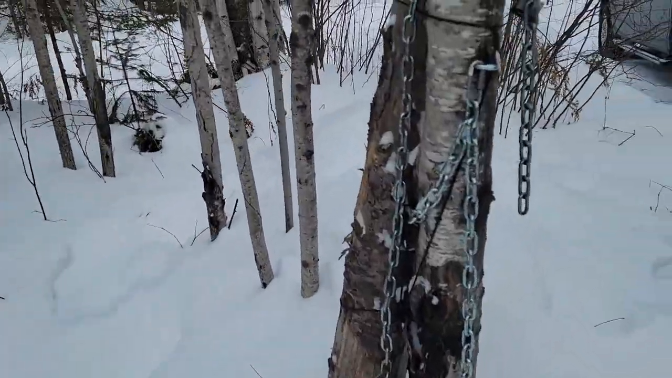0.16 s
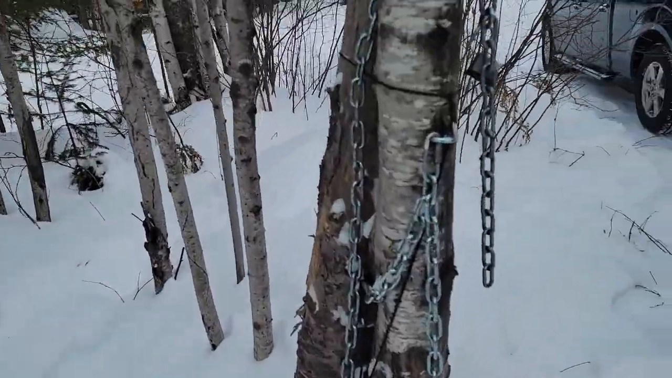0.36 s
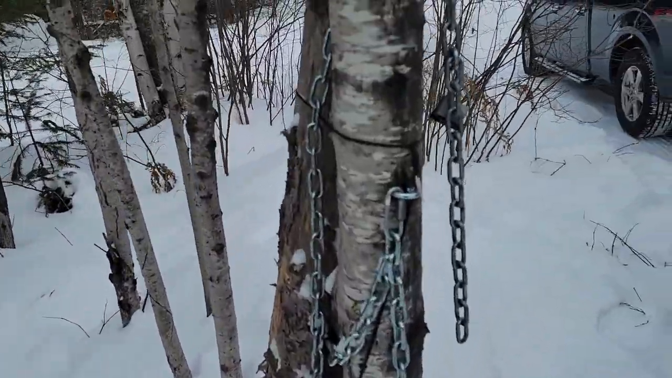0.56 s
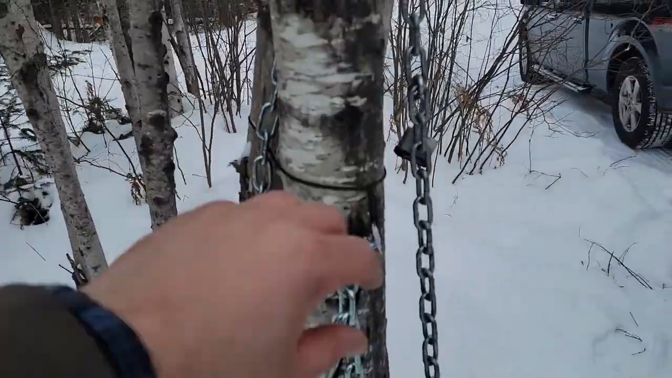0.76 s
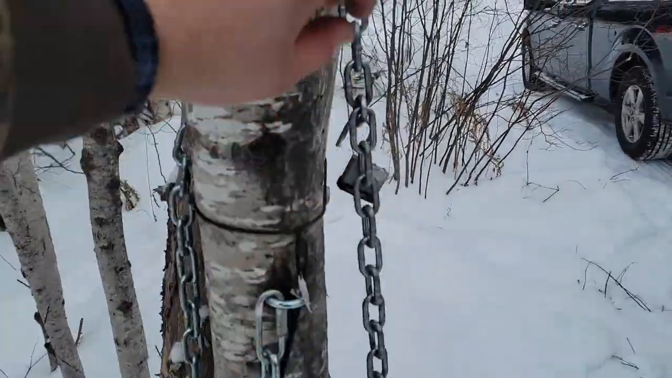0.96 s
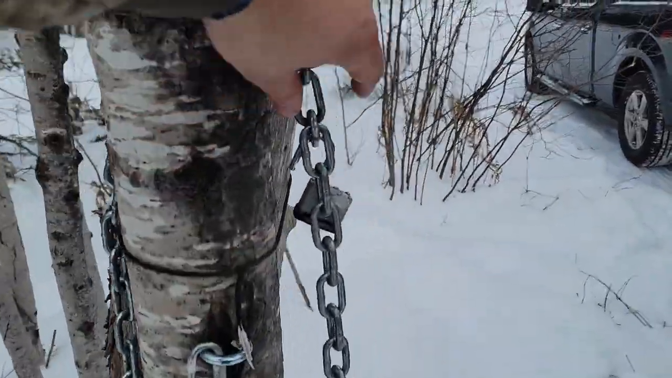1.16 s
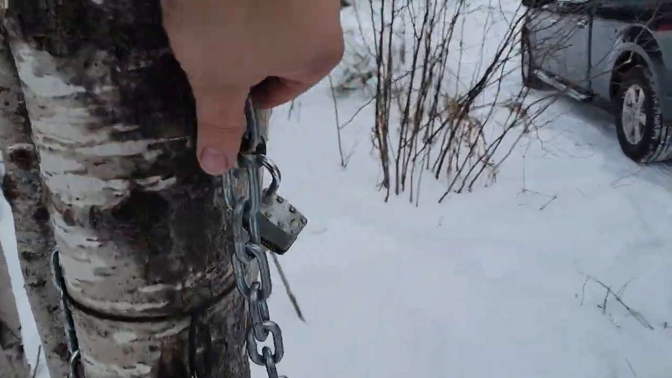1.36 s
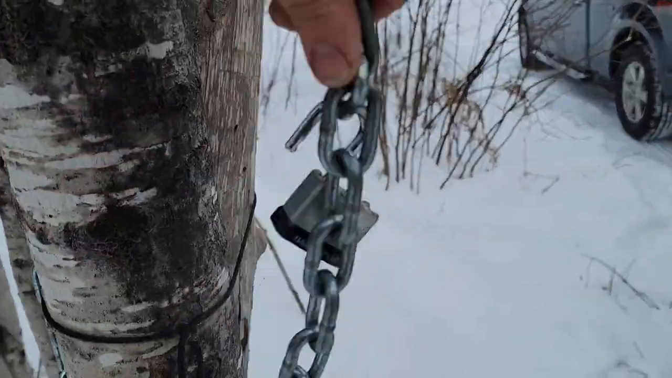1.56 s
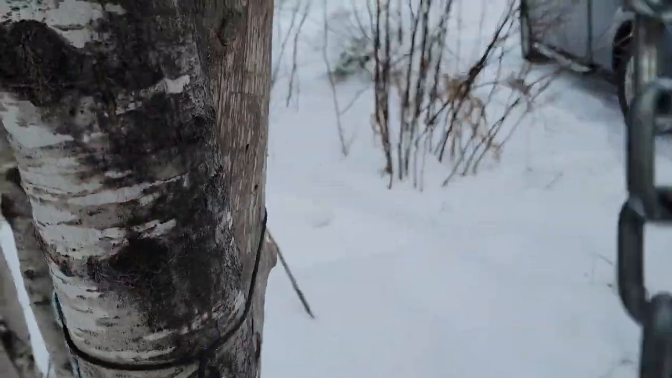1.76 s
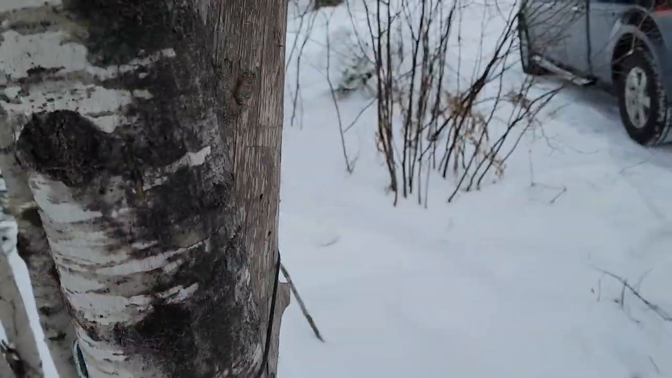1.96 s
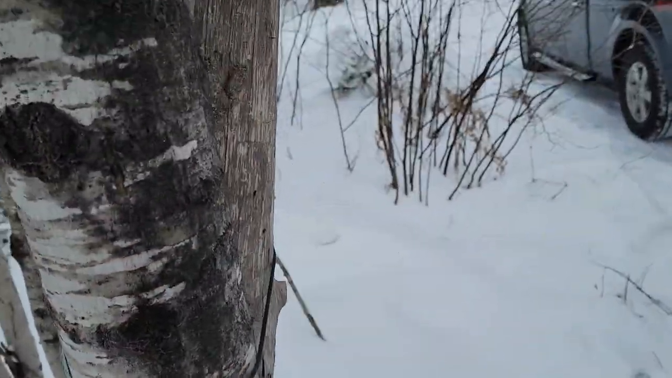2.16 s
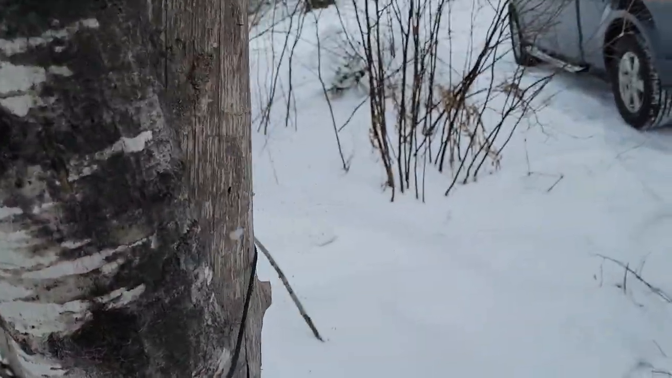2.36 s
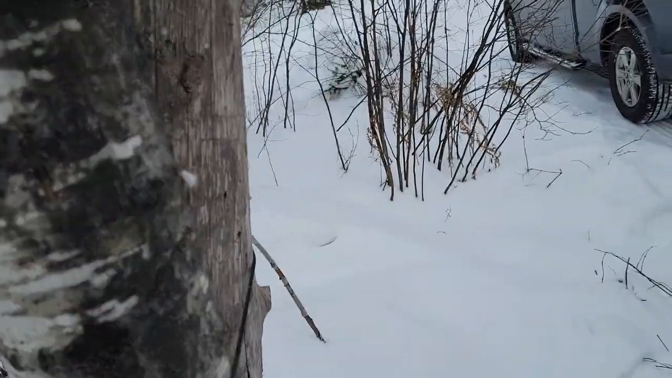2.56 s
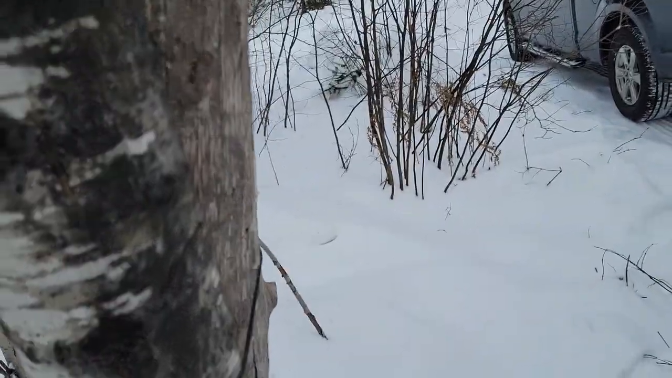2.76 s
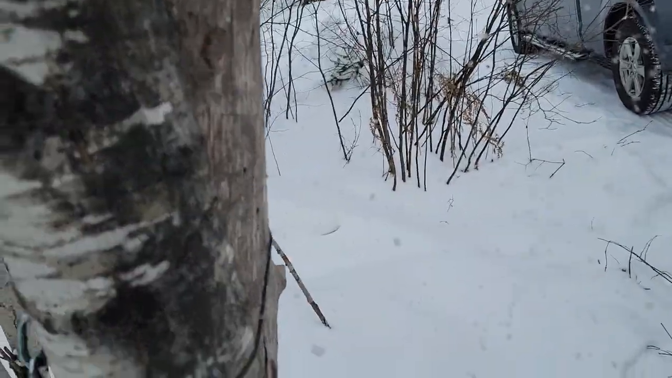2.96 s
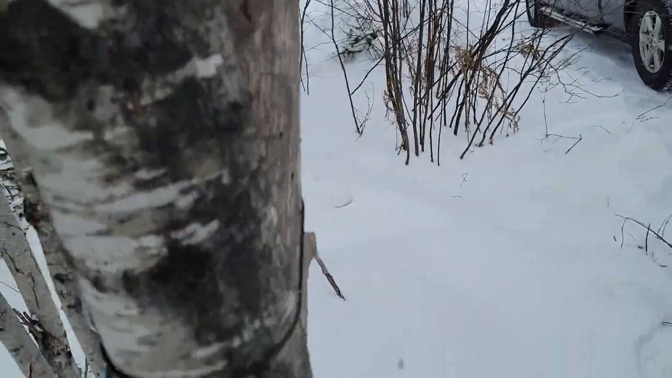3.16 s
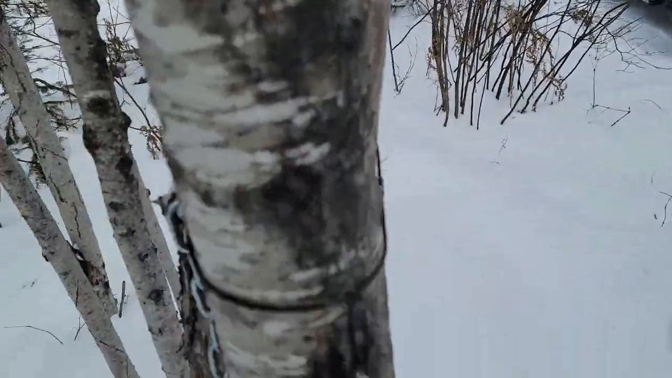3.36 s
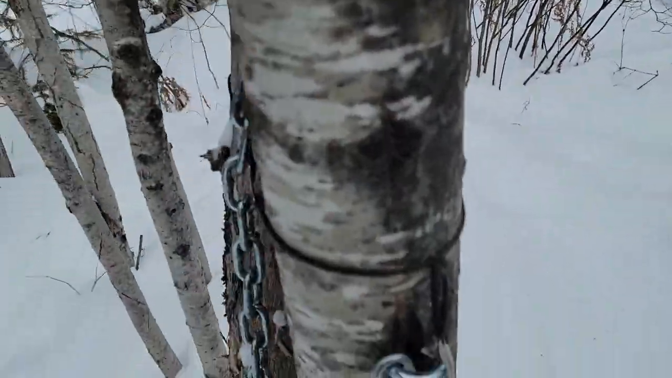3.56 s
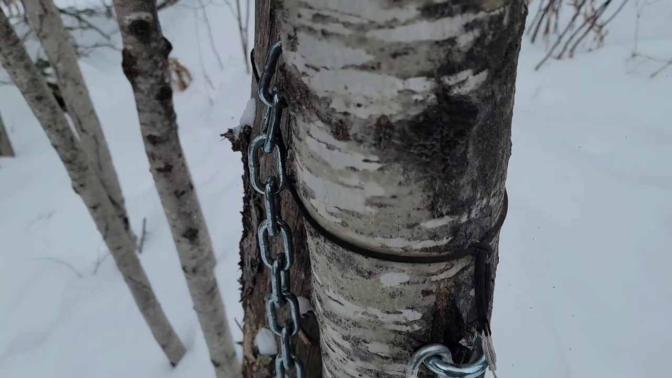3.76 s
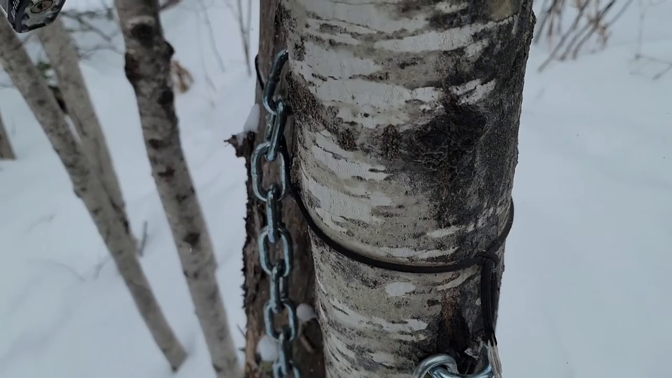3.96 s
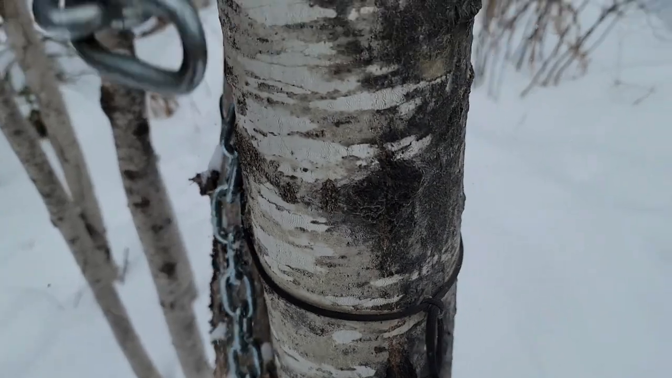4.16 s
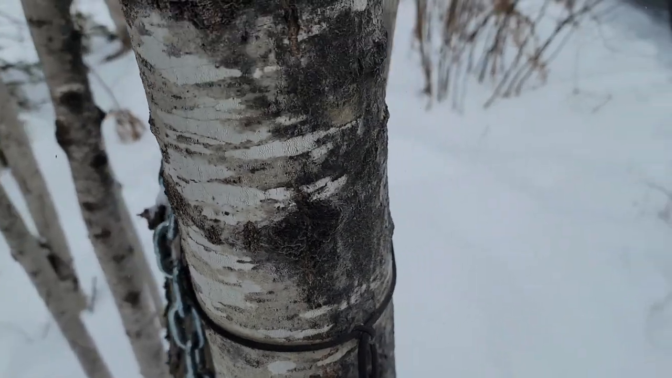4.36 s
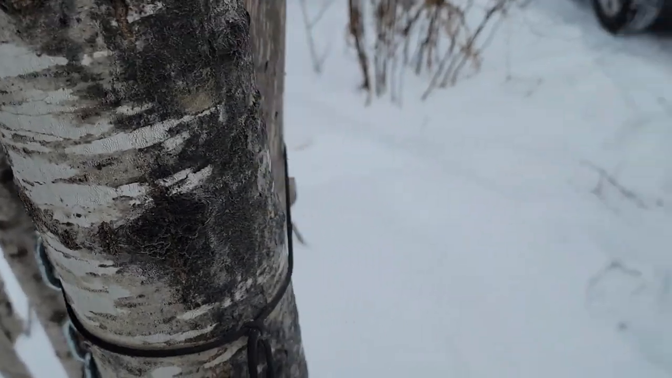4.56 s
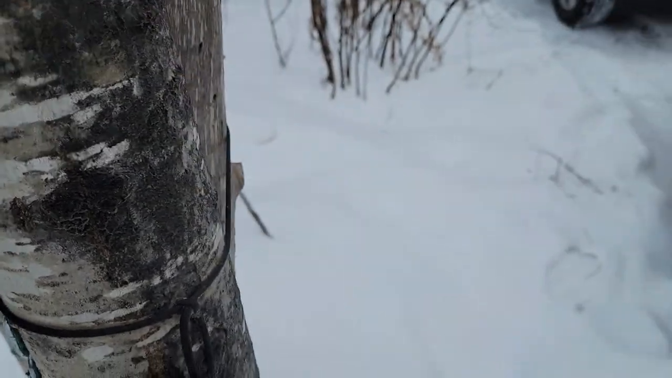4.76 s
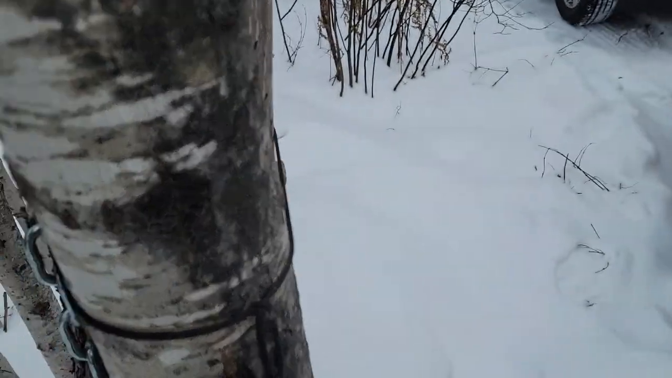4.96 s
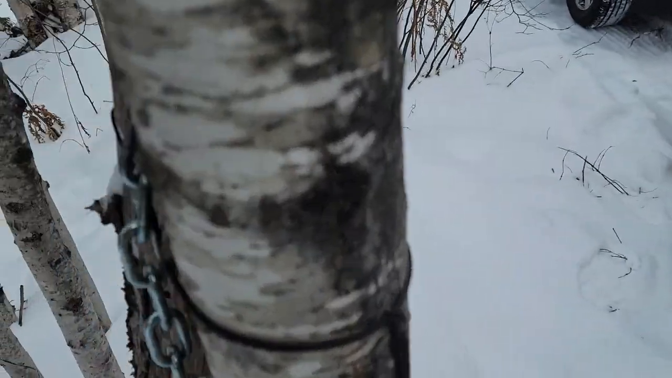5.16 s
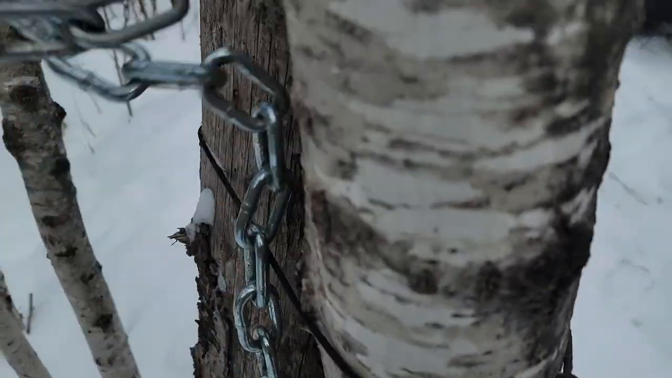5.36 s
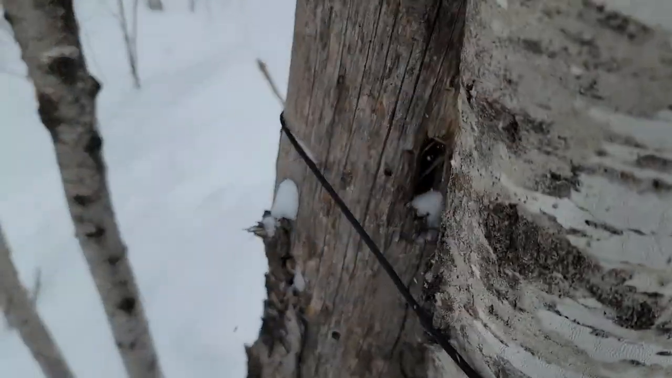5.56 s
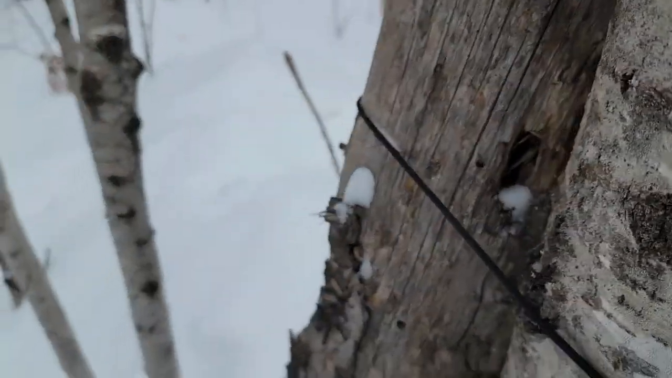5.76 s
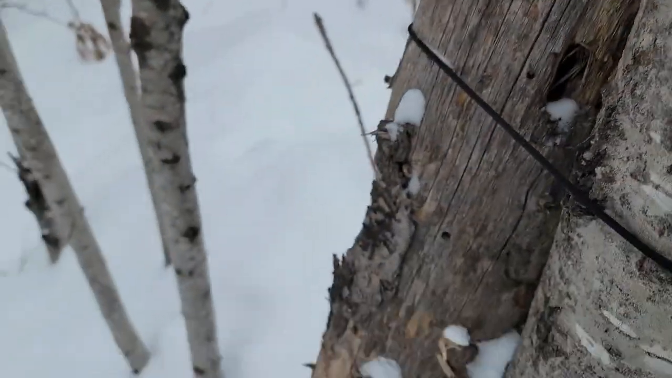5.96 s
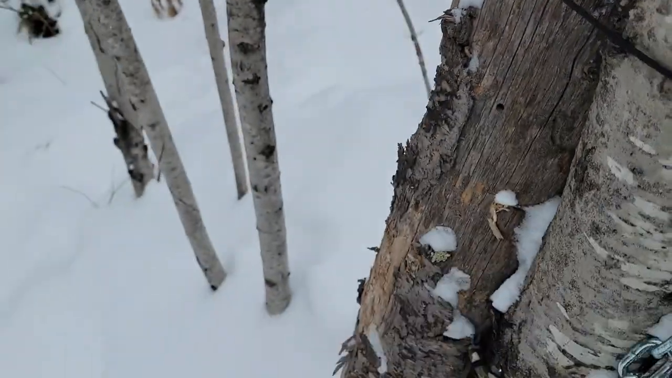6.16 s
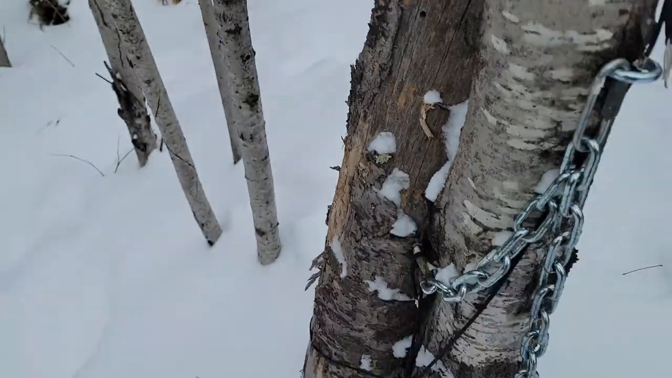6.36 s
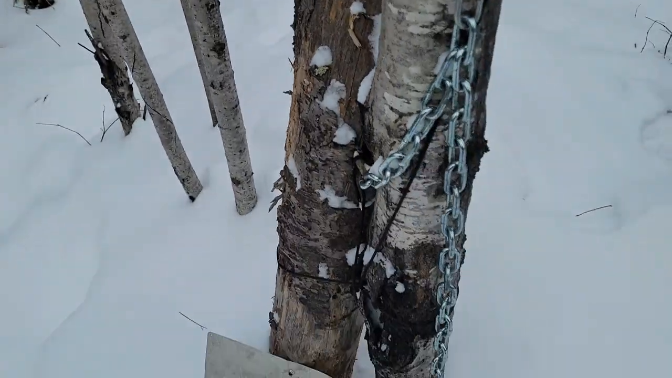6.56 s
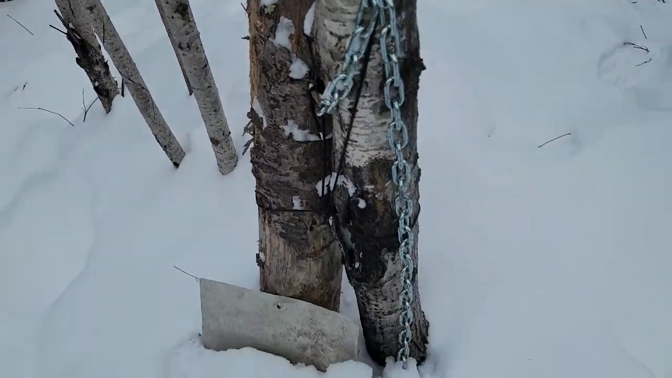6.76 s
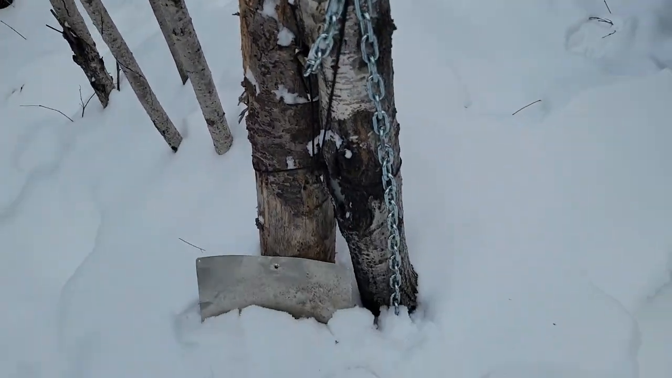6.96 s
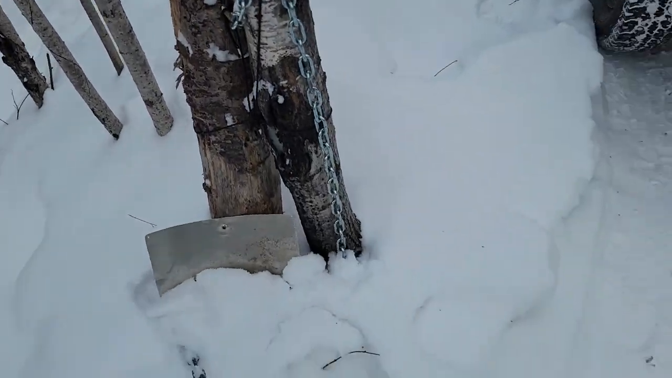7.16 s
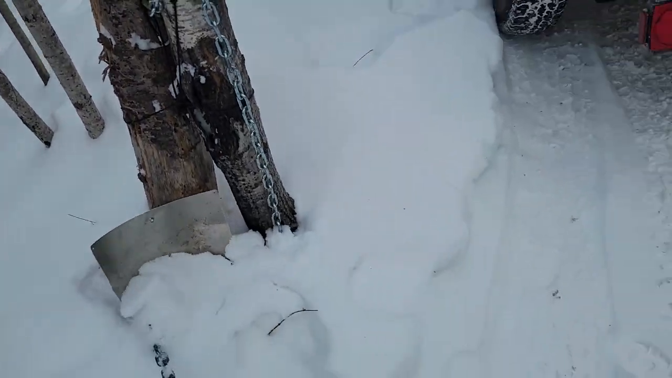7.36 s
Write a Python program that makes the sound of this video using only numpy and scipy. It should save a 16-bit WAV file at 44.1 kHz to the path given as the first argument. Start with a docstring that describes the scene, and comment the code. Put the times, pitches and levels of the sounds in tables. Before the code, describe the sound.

A steel chain is dragged round a tree trunk, scraping bark, knocking wood and chattering brightly, with soft snow crunches before and after.

```python
"""Outdoors in snow, close to a phone: a boot crunches softly and hand and sleeve pat as a steel chain is lifted.
Then it is drawn round a tree post: grains of slip scrape the bark, snags knock, the post groans and booms.
Over this, bursts of random contacts and hard taps set the links chattering and ringing very high.
Last the chain is hung up and boots crunch again. Filtered noise gives a faint hush throughout;
there is no room, only a close echo of the scraping off the trunk."""
import sys
import numpy as np
from scipy import signal
from scipy.fft import rfft, irfft
from scipy.io import wavfile
from scipy.ndimage import uniform_filter1d

SR = 44100
rng = np.random.default_rng(int(sys.argv[2]) if len(sys.argv) > 2 else 0)


def write(x):
    x = np.atleast_2d(x).T
    wavfile.write(sys.argv[1], SR, np.round(np.clip(x, -1, 1) * 32767).astype(np.int16))


N = 327486
TIME = np.arange(N) / SR
SNAP_S = 0.0013  # decay time constant of the first touch of a blow

# colour of steel contacts: f/Hz, relative gain/dB
STEEL_COLOUR = [(1000, -11.5), (6500, 1), (9500, -10), (13600, 0.5)]
# colour of rasping, splintering and crunching: f/Hz, relative gain/dB
RASP_COLOUR = [(300, -20), (800, -2), (1300, 3.5), (2300, 3), (3300, -1), (3900, -7.5), (4900, -15.5),
               (7000, -14), (8500, -25)]
# colour of thuds and packing snow: f/Hz, relative gain/dB
THUD_COLOUR = [(50, -14), (140, -16), (330, -4), (950, -12), (4000, -45.5)]
# side of the dragging and knocks: t/s, left minus right/dB
DRAG_PAN = [(3.1, 1), (3.6, -3)]


def undb(db):
    """Decibels to gain."""
    return 10 ** (np.asarray(db) / 20)


def unit(x):
    """Scale to rms 1."""
    return x / np.sqrt(np.mean(x ** 2) + 1e-18)


def curves(table):
    """Each column of a table, joined by straight lines in time."""
    s, *columns = np.transpose(table)
    return [np.interp(TIME, s, column) for column in columns]


def sides(pan_db):
    """Left and right gains of constant total power; positive is left."""
    return np.sqrt(2 / (1 + undb(np.array([[-2], [2]]) * pan_db)))


def add(out, s, sound):
    """Mix a sound into a stereo signal at time s."""
    i = max(int(s * SR), 0)
    out[:, i:i + sound.shape[1]] += sound[:, :N - i]


def colour(x, points):
    """Minimum-phase filter through (Hz, dB) points, built from the folded cepstrum."""
    hz, db = np.transpose(points)
    size = 2048
    grid_hz = np.maximum(np.fft.rfftfreq(size, 1 / SR), 1)
    gain_db = np.interp(np.log(grid_hz), np.log(hz), db)
    cepstrum = irfft(np.log(undb(gain_db)))
    cepstrum[1:size // 2] *= 2
    cepstrum[size // 2 + 1:] = 0
    impulse = irfft(np.exp(rfft(cepstrum)))
    return signal.fftconvolve(x, impulse[None], axes=1)[:, :x.shape[1]]


def ring(x, hz, t60):
    """One mode, decaying 60 dB in t60 seconds."""
    r = np.exp(-np.log(1000) / (t60 * SR))
    w = 2 * np.pi * hz / SR
    return signal.lfilter([1, -r * np.cos(w)], [1, -2 * r * np.cos(w), r * r], x)


def resonance(x, hz, width_hz):
    """A narrow band of x, with gain near 1 at its centre."""
    t60 = np.log(1000) / (np.pi * width_hz)
    return 2 * np.pi * width_hz / SR * ring(x, hz, t60)


def walk(rate_hz):
    """Smooth random wandering of rms 1."""
    k = max(int(SR / rate_hz), 1)
    held = np.repeat(rng.standard_normal(N // k + 1), k)
    return unit(uniform_filter1d(held, k)[:N])


def grains(rate_hz, spread_db, apart, lag_s=.00027):
    """Tiny uneven slips at two microphone ports: a shared part, late on the right, and a separate part (apart)."""
    clicks = (rng.random((3, N)) < rate_hz / SR) * rng.choice([-1, 1], (3, N))
    sizes = undb(spread_db * np.minimum(rng.exponential(size=(3, N)), 4))
    both, left, right = clicks * sizes
    late = np.roll(both, int(lag_s * SR))
    return unit(np.array([both + apart * left, late + apart * right]))


def swell(s, rise_s, fall_s, hold_s=0, span_db=20):
    """Gain of one movement: grows to 1 at time s, holds and dies away; rise and fall each span span_db."""
    early = np.maximum(s - TIME, 0)
    late = np.maximum(TIME - s - hold_s, 0)
    return undb(-span_db * np.minimum(early / rise_s + late / fall_s, 10))


def outdoors(level_db=-52):
    """Partly shared noise, coloured to a distant low rumble under a thin hush, wanders slowly in level."""
    # f/Hz, relative gain/dB
    hush_colour = [(25, -23), (62, 5.5), (110, -4), (400, -15), (3000, -26.5), (12000, -57)]
    air = rng.standard_normal(N) / 2 + rng.standard_normal((2, N))
    return unit(colour(air, hush_colour)) * undb(level_db + 2 * walk(rate_hz=0.48))


def buffeting(s=2.13, rise_s=.2, fall_s=.34, hold_s=1.65, level_db=-42, hz=65):
    """While the phone moves round the post, air rumbles on each microphone port separately."""
    air = resonance(rng.standard_normal((2, N)), hz, hz)
    return unit(resonance(air, hz, 2 * hz)) * undb(level_db) * swell(s, rise_s, fall_s, hold_s)


def footsteps(give_db=2, attack_s=.027, release_s=.041):
    """Under each load the snow gives way in small collapses, with crystals crackling on top."""
    # boots pressing into snow: t/s, hold/s, packing level/dB, crunch level/dB
    steps = [(0.097, 0.23, -42.5, -47), (6.569, 1, -60, -52.5), (6.981, 0.0059, -31, -34.5),
             (7.097, 0.0054, -33, -45), (7.241, 0.12, -44.5, -55.5)]
    pack, crunch = sum(np.outer(undb([pack_db, crunch_db]), swell(s, attack_s, release_s, hold_s))
                       for s, hold_s, pack_db, crunch_db in steps)
    give = give_db * walk(rate_hz=46)
    low = unit(colour(grains(rate_hz=260, spread_db=3, apart=0.3), THUD_COLOUR))
    high = unit(colour(grains(rate_hz=400, spread_db=2.5, apart=1.0), RASP_COLOUR))
    return low * pack * undb(give) + high * crunch * undb(give / 2)


def sleeve(flutter_db=1.5):
    """Dense fine slips make the smooth hiss of sliding cloth, swelling with each move of the arm."""
    # fastest move t/s, rise/s, fall/s, level/dB
    swishes = [(0.87, 0.49, 0.7, -51), (1.802, 0.28, 0.24, -43.5)]
    cloth = grains(rate_hz=7800, spread_db=8.0, apart=1.0)
    hiss = unit(colour(cloth, [(1000, -34.5), (6500, 9.0), (9000, 0.5)]))
    moves = sum(undb(db) * swell(s, rise_s, fall_s) for s, rise_s, fall_s, db in swishes)
    return hiss * moves * undb(flutter_db * walk(rate_hz=20))


def pats(hz=430, width_hz=330, t60=0.059):
    """A pat is a brief, dull, band-limited burst of cloth or skin on wood."""
    # soft pats of hand and sleeve: t/s, level/dB
    pat_times = [(0.048, -37.5), (0.159, -35), (1.001, -32), (1.064, -30.5), (1.151, -35), (1.187, -31.5),
                 (5.254, -40), (5.285, -39), (6.419, -39.5)]
    force = np.zeros((2, N))
    for s, db in pat_times:
        add(force, s, undb(db - 60 * TIME[None, :SR // 2] / t60))
    rubbing = grains(rate_hz=3500, spread_db=1.5, apart=0.46)
    dull = resonance(resonance(rubbing, hz, width_hz), hz, 2 * width_hz)
    return force * unit(dull)


def thumps(hz=235, t60=0.092):
    """Each soft bump booms the post at one low pitch, within 15 % of hz."""
    # t/s, peak level/dB
    bumps = [(0.252, -26), (2.456, -25), (4.734, -26), (5.367, -21)]
    out, t = np.zeros((2, N)), TIME[None, :SR // 2]
    for s, db in bumps:
        pitch_hz = hz * rng.uniform(.85, 1.15)
        add(out, s, undb(db - 60 * t / t60) * np.sin(2 * np.pi * pitch_hz * t))
    return out


def trunk(x, delay_s=.0013, sway=.14, echo=.35):
    """The trunk mirrors the scraping; the wandering delay of this close echo slides its spectral peaks."""
    late = (TIME - delay_s * (1 + sway * walk(rate_hz=6))) * SR
    mirrored = np.array([np.interp(late, np.arange(N), port) for port in x])
    return (x + echo * mirrored) / np.hypot(1, echo)


def knocks(hook_width_hz=32):
    """Each snag is a dull thud and a spray of splintery clicks that rings the steel hook and dies away."""
    # snags of the chain on the post: t/s, thud level/dB, crack level/dB, t60/s
    snags = [(1.915, -44, -13.5, 0.12), (2.093, -28.5, -31, 0.23), (2.178, -21.5, -25, 0.22),
             (3.149, -38.5, -13.5, 0.41), (3.238, -27.5, -16.5, 0.061), (3.645, -23.5, -16.5, 0.36),
             (3.762, -28, -13, 0.75), (3.772, -9.5, -13.5, 0.03), (4.301, -17.5, -31, 0.066),
             (4.722, -36, -37, 0.15), (5.401, -23.5, -27.5, 0.14)]
    # ringing of the hook: f/Hz, mean gain/dB
    hook_modes = [(1378, -0.5), (2025, 7), (2930, 5.5), (3320, 3.5)]
    thuds, cracks = np.zeros((2, 2, N))
    t = TIME[None, :SR // 2]
    for s, low_db, high_db, t60 in snags:
        decay = undb(-60 * t / t60)
        add(thuds, s, undb(low_db) * decay)
        # the first touch snaps harder than the splinters that follow
        add(cracks, s, undb(high_db) * decay * (1 + np.exp(-t / SNAP_S)))
    thuds = thuds * unit(colour(grains(rate_hz=4600, spread_db=2.5, apart=1.0), THUD_COLOUR))
    cracks = cracks * unit(colour(grains(rate_hz=6000, spread_db=2.5, apart=0.95), RASP_COLOUR))
    # snags meet the hook at different spots, so the balance of modes wanders
    hook = sum(resonance(cracks * undb(db + 3 * walk(rate_hz=2)), hz, hook_width_hz)
               for hz, db in hook_modes)
    return sides(curves(DRAG_PAN)[0]) * (thuds + cracks + hook)


def post(x):
    """The post groans: it lifts a few narrow bands of whatever scrapes it."""
    # f/Hz, width/Hz, gain/dB
    post_modes = [(548, 14, 10), (690, 20, 8), (830, 14, 8)]
    return x + sum(undb(db) * resonance(x, hz, width_hz) for hz, width_hz, db in post_modes)


def muffle(x, q=0.77, sing_db=5.5, sing_q=6, sing_share=0.887):
    """A steep upper edge that moves with the contact, with a narrow resonance added just below it."""
    # upper edge of the rasp: drops, jumps up at 3.66 s, sinks again, then opens: t/s, f/Hz
    edge = [(3.36, 16400), (3.46, 2540), (3.6, 2445), (3.66, 3700), (3.811, 2760), (4.0, 2730), (4.3, 2054),
            (5.4, 15000)]
    hz, s, spectra = signal.stft(x, SR, nperseg=512)
    times, edge_hz = np.transpose(edge)
    ratio = hz[:, None] * np.interp(s, times, 1 / edge_hz)
    sing = 1 + undb(sing_db) / (1 + (2 * sing_q * (ratio / sing_share - 1)) ** 2)
    lowpass = 1 / np.abs(1 - ratio ** 2 + 1j * ratio / q) ** 2
    return signal.istft(spectra * sing * lowpass, SR)[1][:, :N]


def dragging(rub_db=1.0, groan_db=-3, jerk_db=2.5, hollow_hz=740, hollow_t60=0.0027):
    """Each stroke swells and fades; within it links catch and slip on the bark, and the post groans."""
    # chain and sleeve over bark, levels before rub_db, groan_db and filtering by post and edge:
    # hardest pull t/s, rise/s, fall/s, dull rub/dB, rasp/dB, hollow share of the rub (0-1)
    strokes = [(0.86, 0.17, 0.39, -39.5, -42, 0.13), (1.333, 0.14, 0.13, -28, -37.5, 0.8),
               (1.5, 0.36, 0.36, -39.5, -55, 0.82), (1.81, 0.13, 0.15, -41, -33, 0.33),
               (1.93, 0.0077, 0.24, -29, -31, 0.65), (2.21, 0.051, 0.2, -22.5, -43.5, 0.56),
               (2.655, 0.25, 0.26, -14.5, -24, 0.48), (2.722, 0.24, 0.086, -23.5, -10, 0.9),
               (3.03, 0.16, 0.55, -28, -30.5, 0.29), (3.239, 0.062, 0.18, -28.5, -20.5, 0.02),
               (3.48, 0.051, 0.25, -23, -15, 0.14), (3.799, 0.049, 0.17, -31, -10, 0.1),
               (3.88, 0.04, 0.33, -30.5, -18, 0.02), (5.378, 0.083, 0.2, -37.5, -35.5, 0),
               (5.944, 0.087, 0.046, -29.5, -18.5, 0.02), (6.021, 0.034, 0.12, -31.5, -22, 0.06),
               (6.53, 0.11, 0.029, -39, -64, 0.5)]
    # colour of the dull rubbing: f/Hz, relative gain/dB
    rub_colour = [(70, -12), (160, -5.5), (380, 5.5), (740, -4), (1000, -9.5), (1600, -12.5), (4000, -30.5)]
    power = np.zeros((3, N))
    for s, rise_s, fall_s, dull_db, rasp_db, share in strokes:
        gains = undb([dull_db, dull_db, rasp_db]) * [1 - share, share, 1]
        power += np.outer(gains ** 2, swell(s, rise_s, fall_s) ** 2)
    dull_gain, hollow_gain, rasp_gain = np.sqrt(power) * undb(jerk_db * walk(rate_hz=90))
    slips = grains(rate_hz=700, spread_db=1.5, apart=0.36)
    dull = dull_gain * unit(colour(slips, rub_colour))
    hollow = unit(ring(ring(slips, hollow_hz, hollow_t60), hollow_hz, hollow_t60))
    groan = post(hollow_gain * hollow)
    rasp = unit(colour(grains(rate_hz=1000, spread_db=1.43, apart=1.0), RASP_COLOUR))
    bark = rasp_gain * muffle(rasp)
    return sides(curves(DRAG_PAN)[0]) * (dull * undb(rub_db) + groan * undb(groan_db) + bark)


def taps(t60=0.022, low_hz=2200, high_hz=8000, count=14):
    """A hard tap is a sharp crack and a brief, dense clang of the neighbouring links."""
    # one link on another: t/s, level/dB
    tap_times = [(1.535, -31.5), (1.574, -32.5), (2.897, -27), (5.567, -18.5), (5.581, -23), (6.212, -17),
                 (6.275, -41.5)]
    out, t = np.zeros((2, N)), TIME[:SR // 10]
    crack_gain = undb(8) / 2  # each tap's crack, fixed at about 2 dB over its level
    for s, db in tap_times:
        clang = np.zeros((2, len(t)))
        for place in rng.random(count):
            hz = low_hz * (high_hz / low_hz) ** (place ** 2)  # crowded towards low_hz
            clang += np.sin(2 * np.pi * (hz * t + rng.random((2, 1)))) / np.sqrt(count)
        noise = colour(rng.standard_normal((2, len(t))), STEEL_COLOUR)
        crack = crack_gain * np.exp(-t / SNAP_S) * noise
        add(out, s, undb(db) * (clang * undb(-60 * t / t60) + crack))
    return out


def links(hits, held_t60, free_hz=12760, free_t60=.45, free_db=-22,
          tick_db=-7, buzz_hz=13500, buzz_t60=.0025, buzz_db=4):
    """Contacts ring the links at rms 1: pressed ones stop at once, a loose one sings on."""
    # links of slightly different size: f/Hz before detuning, mean gain/dB
    link_modes = [(11290, -13), (12725, 9.5), (13150, 7), (13540, 4), (13830, 4)]
    where = np.flatnonzero(hits)

    def push():
        """Every contact strikes other links, which face the two ports differently."""
        x = np.zeros((2, len(hits)))
        shared = .5 * rng.standard_normal(len(where))
        x[:, where] = hits[where] * (shared + rng.standard_normal((2, len(where))))
        return x

    # the pinched spot itself: a very short, wide buzz and a broad tick, stronger for hard hits
    out = undb(buzz_db) * ring(push(), buzz_hz, buzz_t60) + undb(tick_db) * push() * hits
    for hz, db in link_modes:
        detune, louder_db = rng.standard_normal(2) * [.004, 3]
        out += undb(db + louder_db) * ring(push(), hz * (1 + detune), held_t60)
    loose = undb(free_db) * ring(push(), free_hz, free_t60)
    return unit(colour(out + loose, STEEL_COLOUR))


def clink(length_s, rate_hz=1000, spread_db=2.5, held_t60=.055, fall=.36, hard_s=.024, attack_s=.002):
    """A first contact and a run of chatter; a short clink is a harder blow, and is damped sooner."""
    t = TIME[:SR // 2]
    fade = np.exp(-np.maximum(t / length_s - .7, 0) / fall)  # fall is a share of the length
    force = fade * np.minimum(t / attack_s, 1)
    sizes = undb(spread_db * np.clip(rng.standard_normal(len(t)), -2, 2))
    hits = (rng.random(len(t)) < rate_hz / SR) * sizes * force
    hits[0] = hard_s / length_s
    # same energy as rms 1 over length_s
    return links(hits, min(held_t60, 2 * length_s)) * np.sqrt(length_s / t[-1])


def chain(gain_db=-2.0, pan_db=3, sway_db=1.5, stray_rate_hz=150, stray_db=-30, follow=0.51, jostle_s=.1):
    """Bursts of clinking; around each one the neighbouring links are jostled and tick on their own."""
    # bursts of link-on-link contacts: t/s, level before gain_db/dB, length/s
    bursts = [(1.544, -28, 0.0047), (1.686, -34.5, 0.033), (2.046, -29, 0.012), (2.092, -26, 0.0078),
              (2.215, -10.5, 0.014), (2.549, -13, 0.036), (2.755, -25, 0.04), (2.918, -19.5, 0.024),
              (3.027, -13, 0.076), (3.168, -18.5, 0.083), (3.381, -10.5, 0.045), (3.407, -11, 0.044),
              (3.459, -17, 0.051), (3.855, -13, 0.082), (3.981, -18.5, 0.022), (4.038, -21, 0.052),
              (4.131, -18, 0.046), (4.194, -16.5, 0.047), (4.256, -10.5, 0.061), (4.287, -7, 0.041),
              (4.558, -32.5, 0.0076), (4.719, -12, 0.028), (4.747, -15.5, 0.059), (4.819, -19.5, 0.045),
              (5.036, -34, 0.015), (5.16, -30, 0.007), (5.205, -34, 0.02), (5.401, -18.5, 0.038),
              (5.426, -9, 0.023), (5.46, -12, 0.014), (5.566, -7, 0.032), (5.615, -9, 0.018),
              (5.639, -15.5, 0.016), (5.713, -17.5, 0.013), (5.742, -25.5, 0.12), (5.844, -16.5, 0.022),
              (5.877, -9.5, 0.025), (5.956, -12.5, 0.0083), (6.009, -18, 0.0069), (6.2112, -10, 0.0082),
              (6.429, -33.5, 0.014), (6.677, -31.5, 0.015)]
    out = np.zeros((2, N))
    for s, db, length_s in bursts:
        pan = sides(pan_db + sway_db * rng.standard_normal())
        add(out, s, undb(db + gain_db) * pan * clink(length_s))
    span = int(jostle_s * SR)
    smooth_power = np.abs(uniform_filter1d(uniform_filter1d(out[0] ** 2, span), span))
    unrest = smooth_power ** (follow / 2)
    strays = (rng.random(N) < stray_rate_hz / SR) * rng.random(N)
    return out + undb(stray_db) * unrest * sides(pan_db) * links(strays, 0.047)


def scene():
    """Everything sounds in the open, with no room."""
    background = outdoors() + buffeting() + footsteps()
    handling = sleeve() + pats() + thumps()
    scraping = trunk(dragging() + knocks())
    return background + handling + scraping + taps() + chain()


def record(dry, top_hz=15900):
    """The phone clips at full scale and cuts the top."""
    lowpass = signal.ellip(8, .2, 60, top_hz, fs=SR, output="sos")
    return signal.sosfilt(lowpass, np.clip(dry, -1, 1))


dry = scene()
out = record(dry)
write(out)
```